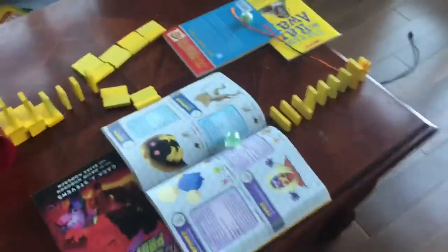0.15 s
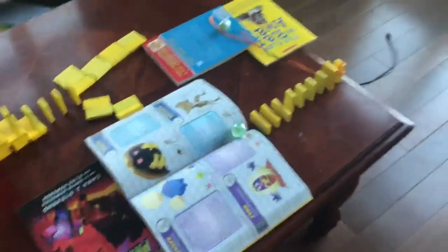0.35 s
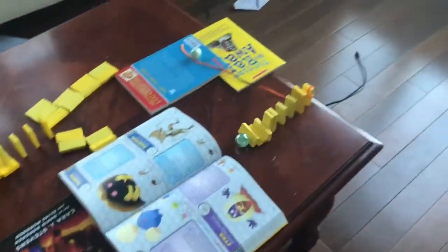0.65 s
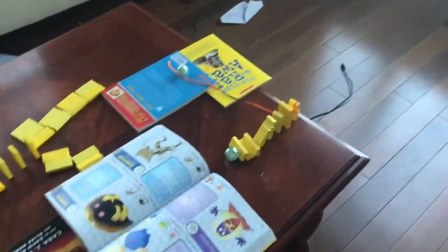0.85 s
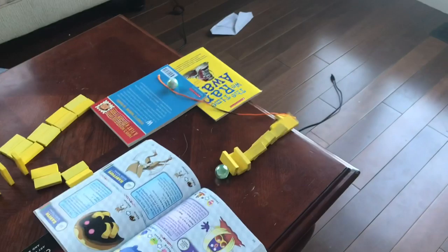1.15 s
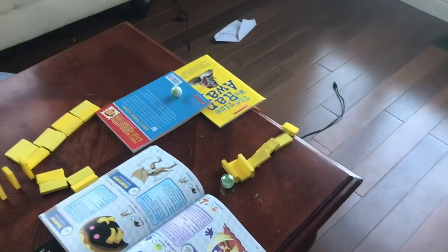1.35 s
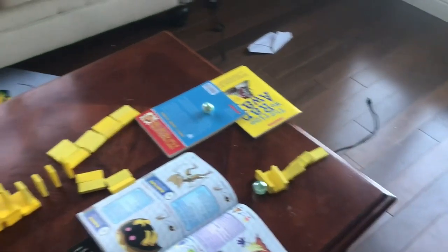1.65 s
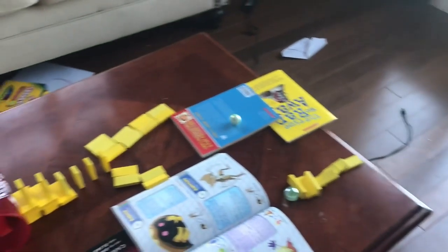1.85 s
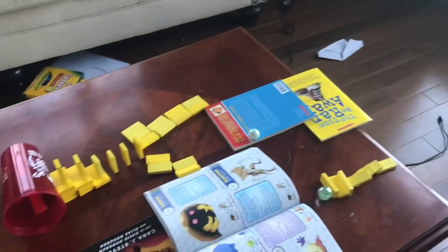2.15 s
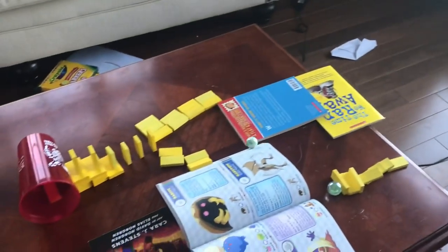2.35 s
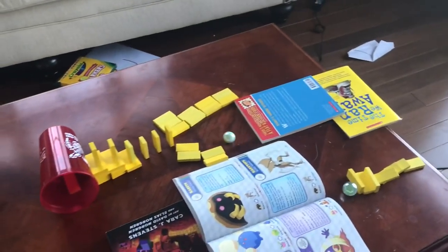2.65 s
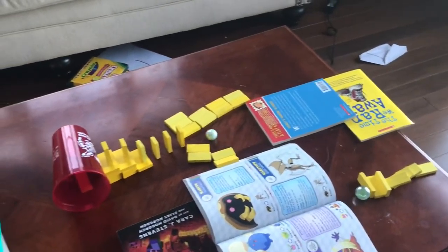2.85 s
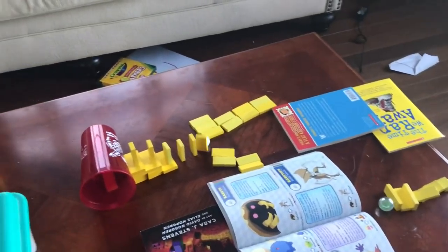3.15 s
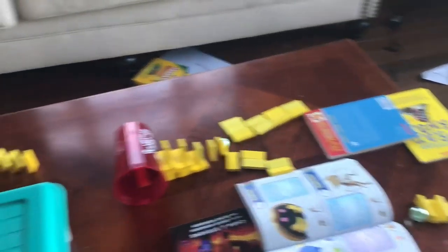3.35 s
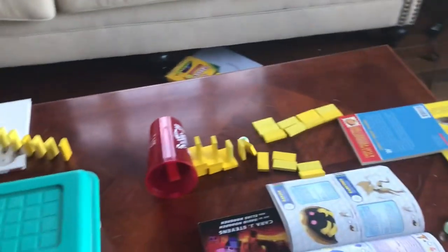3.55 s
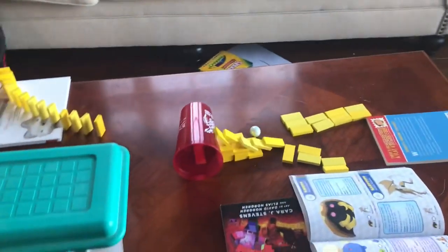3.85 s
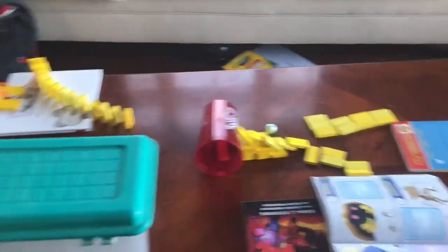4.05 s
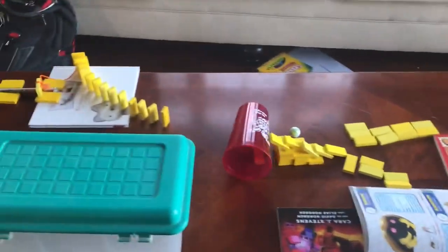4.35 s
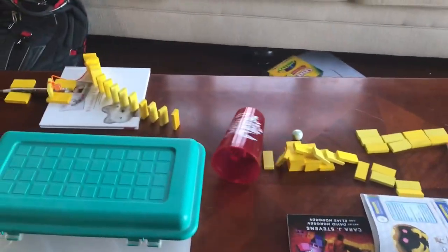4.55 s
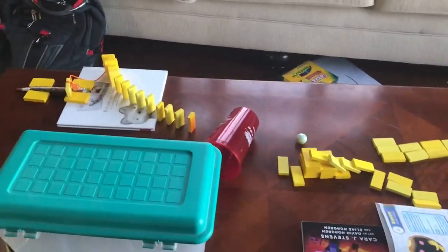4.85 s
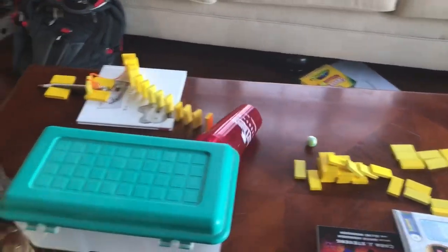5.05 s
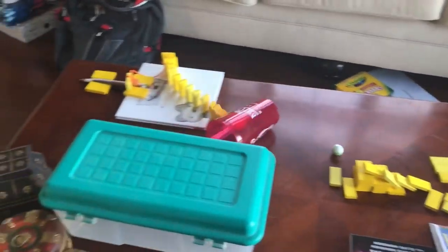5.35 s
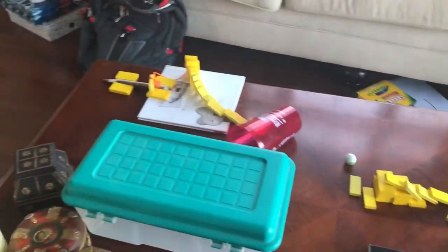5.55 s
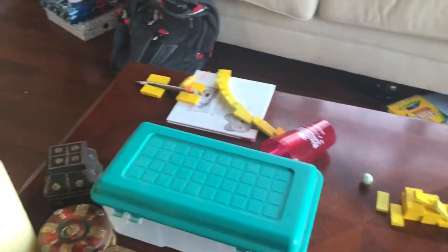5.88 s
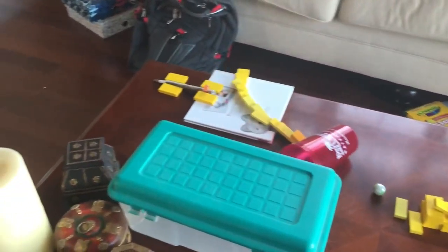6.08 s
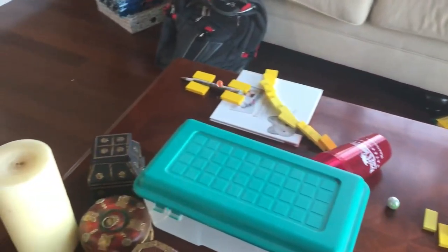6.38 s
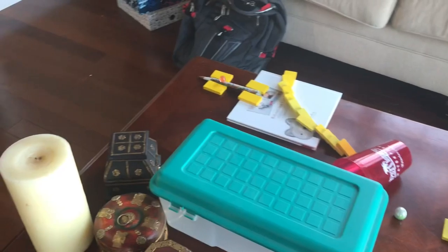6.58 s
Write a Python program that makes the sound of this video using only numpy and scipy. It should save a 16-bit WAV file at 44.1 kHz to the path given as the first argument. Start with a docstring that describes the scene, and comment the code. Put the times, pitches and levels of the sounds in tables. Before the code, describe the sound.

Plastic dominoes topple on a wooden table in short clattering runs with brief pauses, while a marble rolls and bumps among them.

```python
"""Hollow plastic dominoes topple in short runs on a polished wooden table in a living room.
Slabs knock on the table, tick on each other's edges and rattle: clicks ringing damped modes.
A marble rolls, bumps and rattles, driving the table modes, and drops off a book; a small metal
piece rings as it bounces on the floor. The room answers every blow over a quiet hum."""
import sys
import numpy as np
from scipy import signal
from scipy.io import wavfile

SR = 44100
rng = np.random.default_rng(int(sys.argv[2]) if len(sys.argv) > 2 else 0)


def waveform_to_disk(signal):
    """Save audio, clipped to [-1, 1], as 16-bit WAV at the path in sys.argv[1]."""
    frames = np.transpose(np.atleast_2d(signal))
    scaled = np.clip(frames, -1, 1) * 32767
    samples = np.round(scaled).astype(np.int16)
    wavfile.write(sys.argv[1], SR, samples)


N = 296352

# modes of table top, slab body and slab edge: f/Hz, level/dB, t60/s
TABLE_MODES = [(111, -13.5, 0.054), (159.7, -7.5, 0.064), (226.3, -5.5, 0.068), (322, -4.5, 0.031),
               (382.4, -2, 0.048), (551.5, 4.5, 0.022), (617, 6.5, 0.027), (675, -13, 0.062)]
SLAB_LOW_MODES = [(835, -13.5, 0.0029), (1072, -5.5, 0.026), (1229, 1.5, 0.012), (1410, -8.5, 0.024),
                  (1754, -7.5, 0.0076)]
SLAB_HIGH_MODES = [(2080, -6, 0.0096), (2118, -2, 0.0076), (2462, 4, 0.013), (2730, -9, 0.015),
                   (2823, -9, 0.026), (3440, -11.5, 0.0011)]
EDGE_MODES = [(3800, -2, .004), (4500, 1, .005), (6900, -16, .003), (5150, 1, .004), (5800, -7, .004)]
EDGE_CONTACT_HZ = 5400


def amp(db):
    """Decibels to gain."""
    return 10 ** (np.asarray(db) / 20)


def unit_rms(x):
    """Scale to rms 1."""
    return x / np.sqrt(np.mean(x ** 2) + 1e-20)


def samples(t_s):
    """Seconds to sample indices."""
    return np.clip(np.round(t_s * SR).astype(int), 0, N - 1)


def in_time(rows):
    """Columns of a curve, one value per sample."""
    t_s, *columns = np.transpose(rows)
    return [np.interp(np.arange(N) / SR, t_s, column) for column in columns]


def at_hz(points, hz):
    """Read a spectrum on a log-frequency axis."""
    points_hz, values = np.transpose(points)
    return np.interp(np.log(hz), np.log(points_hz), values)


def cut(x, hz, kind, order=2):
    """Butterworth low- or high-pass."""
    return signal.sosfilt(signal.butter(order, hz, kind, fs=SR, output="sos"), x)


def bands(white):
    """Yield (centre/Hz, third-octave noise); neighbours use unrelated noise."""
    edges_hz = 22 * 2 ** np.arange(0, 9.7, 1 / 3)
    for k, (low, high) in enumerate(zip(edges_hz, edges_hz[1:])):
        sos = signal.butter(2, [low, high], "band", fs=SR, output="sos")
        yield np.sqrt(low * high), signal.sosfilt(sos, white[k % 2])


def drift(rate_hz):
    """Slow random curve of rms 1."""
    hop = 40
    r = np.exp(-2 * hop * np.pi * rate_hz / SR)
    slow = signal.lfilter([1], [1, -2 * r, r * r], rng.standard_normal(N // hop + 2002))[2000:]
    return np.interp(np.arange(N) / hop, np.arange(len(slow)), unit_rms(slow))


def ring(drive, hz, t60_s):
    """One mode: a unit click starts a decaying sine of height 1."""
    r, w = amp(-60 / (t60_s * SR)), 2 * np.pi * hz / SR
    return signal.lfilter([0, np.sin(w)], [1, -2 * r * np.cos(w), r * r], drive + 1e-18)


def strike(modes, at, db, share_db=0, spread_db=1):
    """Blows into a body, mode strengths random per blow; rows: direct, room send."""
    scatter = np.random.default_rng(rng.integers(2 ** 31)).uniform(-1, 1, (len(at), len(modes)))
    out = np.zeros((2, N))
    for k, (hz, mode_db, t60_s) in enumerate(modes):
        sign = -1 if k % 3 == 2 else 1  # most modes start in step: opening spike
        size = sign * amp(db + mode_db + spread_db * scatter[:, k])
        clicks = np.zeros((2, N))
        np.add.at(clicks, (0, at), size)
        np.add.at(clicks, (1, at), size * amp(share_db))
        out += ring(clicks, hz, t60_s)
    return out


def hum():
    """House hum and microphone hiss, each band wavering; a faint whine sets in."""
    floor_spectrum = [(20, -16), (35, -8.5), (70, 3), (150, -3), (350, -2), (700, -15.5), (1400, -19.5),
                      (2500, -31.5), (3300, -24.5), (7700, -35.5), (10400, -36), (12500, -43),
                      (15000, -24.5), (16500, -28.5)]  # noise floor: f/Hz, relative density/dB
    white = rng.standard_normal((2, N + SR))
    floor = sum(amp(at_hz(floor_spectrum, hz) + 2.7 * drift(rate_hz=22)) * band[SR:]
                for hz, band in bands(white))
    whine_hz, width_hz, onset_s = 9350, 200, 2.4
    whine = ring(rng.standard_normal(N), whine_hz, t60_s=np.log(1000) / (np.pi * width_hz))
    fade_in = np.clip(np.arange(N) / SR - onset_s, 0, 1)
    return amp(-55) * unit_rms(floor) + amp(-84.5) * fade_in * unit_rms(whine)


def room(x, patterns=4, place_s=0.3495, onset_s=0.00096):
    """Diffuse echoes: noise dying band by band; the pattern changes as the listener moves."""
    decay = [(100, 0.22), (300, 0.39), (1000, 0.42), (2500, 0.38), (5000, 0.38), (12000, 0.26)]  # reverberation time: f/Hz, t60/s
    colour = [(100, 11.5), (300, 4), (1000, 2.5), (2500, 5), (5000, -4.5), (12000, -5)]  # echo spectrum: f/Hz, level/dB
    t = np.arange(SR) / SR
    tails = sum(amp(at_hz(colour, hz) - 60 * t / at_hz(decay, hz)) * band
                for hz, band in bands(rng.standard_normal((2, patterns, SR))))
    tails *= 1 - np.exp(-(t / onset_s) ** 2)
    place = np.arange(N) / SR / place_s % patterns
    out = 0
    for k, tail in enumerate(tails):
        away = np.abs((place - k + patterns / 2) % patterns - patterns / 2)
        weight = np.cos(np.pi / 2 * np.minimum(away, 1))  # equal-power crossfade
        out += signal.fftconvolve(x * weight, tail / np.sqrt(np.sum(tail ** 2)))[:N]
    return out


def room_share_db(t_s):
    """Farther blows give the room a larger share."""
    share = [(0, -3), (.45, 0), (.85, 2), (1.1, -3), (1.4, 1.5), (1.9, 0.5), (2.4, 3), (2.9, 7.5),
             (3.25, -4), (3.6, 2), (4.4, -3), (4.7, -2), (5.3, 3.5), (5.8, -2.5), (6.1, 4.5), (6.5, 6.5),
             (6.72, -7)]  # room send: t/s, level/dB
    return np.interp(t_s, *np.transpose(share))


def near_echoes(x):
    """Close reflections spread each blow over some milliseconds."""
    echoes = [(.0012, -8), (.0029, -10), (.0046, -12), (.0071, -15)]  # off table top and neighbours: delay/s, level/dB
    out = x.copy()
    for k, (delay_s, db) in enumerate(echoes):
        lag = round(delay_s * SR)
        out[lag:] += (-1) ** k * amp(db) * x[:-lag]
    return out


def marble_roll():
    """Rough rolling contact keeps the table humming; on the page the marble sings thinly."""
    rolling = [(0, -43.5), (1.21, -45.5), (1.91, -42), (2.3, -49.5), (2.47, -34.5), (2.84, -37),
               (3.01, -43.5), (3.39, -50.5), (4.32, -49), (4.51, -42), (4.7, -49.5), (6.1, -49.5),
               (6.31, -50), (6.72, -44)]  # hum of the table top: t/s, level/dB
    start_s, end_s, tone_hz, tone_t60_s, tone_db = (.12, 0.8, 1959, 4, -52.5)  # tone on the page
    t = np.arange(N) / SR
    rough = rng.standard_normal(N)
    rumble = unit_rms(sum(amp(db) * ring(rough, hz, t60_s) for hz, db, t60_s in TABLE_MODES))
    tone = unit_rms(ring(rough, tone_hz, tone_t60_s))
    on_page = np.clip(np.minimum(t - start_s, end_s - t) / 0.013, 0, 1)
    return amp(in_time(rolling)[0] - 10) * rumble + amp(tone_db) * on_page * tone


def marble_drop():
    """The marble drops off a book's edge: dull blows into book and table."""
    thumps = [(2.303, -30), (2.323, -25.5), (2.344, -30), (2.39, -34), (2.42, -34)]  # blows: t/s, level/dB
    book_modes = [(213, -27, 0.095), (220, 2.5, 0.052), (280, 0.5, 0.07), (339, -1.5, 0.07)]  # book on table: f/Hz, level/dB, t60/s
    t_s, db = np.transpose(thumps)
    thuds = strike(book_modes, samples(t_s), db, share_db=1.6, spread_db=6)
    return cut(cut(thuds, 330, "low"), 180, "high")


def metal_bounces():
    """A metal piece rings, its mode balance differing per bounce; heard mostly via the room."""
    bounces = [(1.409, -76, -60, -87), (1.557, -59, -85, -62), (1.707, -56, -85, -75),
               (1.767, -56, -85, -74), (1.933, -53, -82, -74), (2.016, -45, -82, -80)]  # floor hits: t/s, level/dB of low, mid, high group
    mode_groups = [
        [(5800, -3, .15), (5880, 0, .2), (5990, -3, .15), (6170, -5, .12), (6420, -11, .1)],
        [(9400, 0, .08), (9650, -2, .07), (12500, -4, .05), (12750, -5, .05)],
        [(13800, 0, .07), (14150, -2, .07)],
    ]  # three groups of modes: f/Hz, level/dB, t60/s
    t_s, *groups_db = np.transpose(bounces)
    return sum(strike(modes, samples(t_s), db - 4, share_db=12, spread_db=3)
               for modes, db in zip(mode_groups, groups_db))


def soft_face(x, contact_hz=3920, radiation_hz=568):
    """A flat contact lasts long enough to lose treble; a small slab radiates no bass."""
    return cut(cut(x, contact_hz, "low", order=4), radiation_hz, "high", order=4)


def rattle(rate_per_s=430):
    """Many small uneven contacts: slabs rattling and, around 2.5-3 s, the marble rolling."""
    rattling = [(0, -50, -25), (.07, -56, 4), (.12, -43.5, -28), (.24, -52, -27), (.45, -61, -12),
                (.92, -41, -32), (1.14, -82, -34), (1.23, -31.5, -55), (1.4, -63, 1), (1.81, -46, -20),
                (2.13, -53, -31), (2.34, -67, 0), (2.52, -40, -31), (2.8, -44, -60), (3.03, -46, -27),
                (3.2, -67.5, -10), (3.7, -49.5, -34), (3.97, -63, -13.5), (5.17, -61.5, -17),
                (5.37, -35.5, -30), (5.56, -48, -30), (6.14, -70, -1.5), (6.4, -44, -21),
                (6.72, -57, -13.5)]  # contact strength: t/s, level/dB, brightness/dB
    db, bright_db = in_time(rattling)
    at = np.flatnonzero(rng.random(N) < rate_per_s / SR)
    size_db = 2.64 * np.minimum(rng.exponential(1, N), 4)[at] + db[at]
    low = strike(SLAB_LOW_MODES, at, size_db - 4, spread_db=3.5)
    high = strike(SLAB_HIGH_MODES, at, size_db + 0.41 * bright_db[at] - 3, spread_db=6)
    edge = strike(EDGE_MODES, at, size_db + bright_db[at], spread_db=10.5)
    return soft_face(low + high) + cut(edge, EDGE_CONTACT_HZ, "low")


def edge_ticks():
    """Thin edges touch: only short, high modes sound."""
    ticks = [(0.0371, -31, -19), (0.059, -43, -9), (0.401, -32, -30), (.421, -29, -39), (0.429, -20, -53),
             (0.4912, -17, -55), (.549, -39, -18), (.582, -41.5, -29), (.728, -45, -16),
             (0.814, -40.5, -15), (0.826, -46, -13), (.8507, -29.5, -24), (1.003, -17, -28),
             (1.0912, -19, -45), (1.1772, -22, -57), (1.2423, -30, -41), (1.2895, -31.5, -23),
             (1.409, -22, -23), (1.5596, -21, -30), (1.707, -20.5, -49), (1.77, -17, -24.5),
             (1.9306, -16.5, -19), (2.0161, -18, -12.5), (2.325, -28, -54), (2.908, -45, -31),
             (3.0003, -49, -31), (3.236, -18, -20.5), (3.577, -35, -13), (3.6187, -22.5, -20),
             (3.657, -43, -33), (3.702, -35.5, -11.5), (3.763, -34.5, -18), (3.799, -41, -16),
             (4.372, -31, -37), (4.4187, -16.5, -17), (4.4764, -36, -24), (4.706, -18, -13),
             (5.12, -48, -28), (5.201, -35.5, -35.5), (5.251, -33, -26), (5.285, -24.5, -26),
             (5.3144, -21, -26), (5.3467, -31, -10), (5.3702, -35.5, -9), (5.4146, -37, -7),
             (5.461, -35, -10), (5.4955, -47, -15), (5.512, -47, 3.5), (5.528, -31, -15),
             (5.7177, -33.5, -25), (5.7905, -37, -26), (5.82, -32.5, -42), (5.9125, -40.5, -16),
             (6.096, -34, -40), (6.105, -20.5, -24), (6.312, -60, 3), (6.4977, -38.5, -41),
             (6.7104, -22, -33)]  # edge contacts: t/s, level/dB, relative top modes/dB
    top_modes = [(7200, -4, .003), (8000, -5, .003), (8900, -6, .003), (9900, -8, .003), (11000, -9, .003),
                 (12600, -15, .002), (15000, -16, .002)]  # highest edge modes: f/Hz, level/dB, t60/s
    t_s, db, top_db = np.transpose(ticks)
    at, share_db = samples(t_s), room_share_db(t_s) + 5.5  # edges reach the room more
    low = cut(strike(EDGE_MODES, at, db - 8, share_db, spread_db=8), EDGE_CONTACT_HZ, "low")
    top = strike(top_modes, at, db + top_db + 1, share_db, spread_db=8)
    return cut(low + top, 1600, "high", order=4)


def table_knocks():
    """Slabs landing and, around 2.7-3 s, the rolling marble's bumps: slap, ring, table boom."""
    knocks = [(0.027, -30, -10.5, -8), (0.032, -21, -6.5, -8), (.4, -16.5, -21, -8), (.428, 5.5, -22.5, -8),
              (.444, -15, -29, -5), (.454, -34, -22, -6), (.5, -2.5, -26, -9.5), (.535, -8.5, -22, -4),
              (.548, -12.5, -10, -13), (0.564, -10, -41, -11), (0.585, -10.5, -33, -10),
              (0.813, -29.5, -16, -5), (.827, -31, -24, -3), (.85, -20.5, -14.5, 3), (1.006, -3, -54, -29),
              (1.045, -19.5, -9, -1.5), (1.094, 3, -44, -8.5), (1.127, -9.5, -23, -16),
              (1.179, -10, -29.5, 1.5), (1.242, -10.5, -31, 1.5), (1.288, -23, -6, -1),
              (1.41, -11, -20, -1), (1.558, -2.5, -15, -6.5), (1.708, -10.5, -17.5, 0.5),
              (1.769, -13.5, -33, -3), (1.799, -21.5, -11.5, -12), (1.861, -18.5, -26, -4),
              (1.93, -17, -13, -0.5), (2.016, -15.5, -12.5, -7), (2.304, -18, -36, -6),
              (2.324, -12.5, -30, -10), (2.35, -17, -10.5, -6), (2.39, -6.5, -33, -10),
              (2.416, -11.5, -40, -9), (2.434, -14.5, -31, -5), (2.449, -20.5, -4, -15),
              (2.741, -28, -6.5, -30), (2.884, -24, -10, -21), (2.905, -19, -15.5, -22),
              (2.916, -22.5, -15, -5), (2.928, -27, -31, -33), (2.978, -30.5, -6, -5.5),
              (3.191, -34.5, -15, 0), (3.236, -10, -14, -3.5), (3.575, -24, -11, 1), (3.62, -23, -11, 3),
              (3.659, -24.5, -9, -1.5), (3.764, -36, 4, 6.5), (3.797, -31, -0.5, 1), (3.816, -31, -19, -28),
              (4.32, -41.5, -6, 1), (4.371, -5, -15.5, -8), (4.394, -21, 0, -33), (4.408, -27, -5, -22),
              (4.419, -18, -13, 0.5), (4.432, -18, -11, -9), (4.451, -19.5, -30, -8),
              (4.479, -14.5, -17, -10.5), (4.707, -12, -16, -1), (5.121, -30, -9, -23),
              (5.204, -29, -9, 1.5), (5.248, -20, -12.5, -2.5), (5.285, -20.5, -15, 1),
              (5.314, -19.5, -22, 0), (5.349, -19, -11.5, -0.5), (5.374, -31, -11, -3),
              (5.398, -30, -35, 9), (5.408, -33, -32, -7), (5.414, -25, -34, -3), (5.451, -21, -20, -2.5),
              (5.495, -20, -16, -1.5), (5.527, -20.5, -21, -4.5), (5.541, -21.5, -23, -2.5),
              (5.554, -29, -16, -4), (5.72, -19.5, -11, -0.5), (5.791, -19.5, -10.5, -9),
              (5.843, -22, -8.5, -6), (5.862, -30, -10, -17), (5.914, -23, -8.5, -14),
              (6.093, -8, -18.5, -7.5), (6.102, -18.5, -10, 0), (6.119, -17.5, -42, -4),
              (6.31, -14.5, -16, -6), (6.408, -21, -23, -11.5), (6.497, -20.5, -27, -5.5),
              (6.709, -5.5, -38, -1)]  # blows: t/s, level/dB, relative boom/dB, relative high modes/dB
    seatings = (.95, 1, 1.06)  # how a slab rests shifts its modes: pitch ratios, used in turn
    slap_modes = [(1300, 0, .003), (2400, -2, .003)]  # air squeezed from under a face: f/Hz, level/dB, t60/s
    t_s, db, boom_db, high_db = np.transpose(knocks)
    at, share_db = samples(t_s), room_share_db(t_s)
    clack = np.zeros((2, N))
    for k, ratio in enumerate(seatings):
        turn = slice(k, None, len(seatings))
        low_modes = np.array(SLAB_LOW_MODES) * [ratio, 1, 1]
        high_modes = np.array(SLAB_HIGH_MODES) * [ratio, 1, 1]
        clack += strike(low_modes, at[turn], db[turn] - 11, share_db[turn], spread_db=8)
        clack += strike(high_modes, at[turn], (db + high_db)[turn] - 6.5, share_db[turn], spread_db=5.5)
    clack += strike(slap_modes, at, db - 4, share_db - 2.5, spread_db=2.5)
    boom = strike(TABLE_MODES, at, db + boom_db - 10, share_db, spread_db=5)
    return soft_face(clack) + cut(cut(boom, 1300, "low"), 110, "high")


def scene():
    """Blows and their echoes over the rolling marble and the hum; mono."""
    direct, room_send = table_knocks() + rattle() + marble_drop() + edge_ticks() + metal_bounces()
    return (near_echoes(direct) + amp(-5) * room(room_send) + marble_roll() + hum())[None]


def record(dry):
    """The level dips briefly; the loudest peaks are rounded, the top is cut steeply."""
    start_s, end_s, dip_db = (0.082, 0.135, -6.5)
    ramp_s, ceiling, stop_hz = 0.004, 1.3, 16500
    t = np.arange(N) / SR
    dip = amp(dip_db * np.clip(np.minimum(t - start_s, end_s - t) / ramp_s, 0, 1))
    rounded = ceiling * np.tanh(dip * dry / ceiling)
    return signal.sosfilt(signal.cheby2(14, 80, stop_hz, fs=SR, output="sos"), rounded)


dry = scene()
out = record(dry)
waveform_to_disk(out)
```